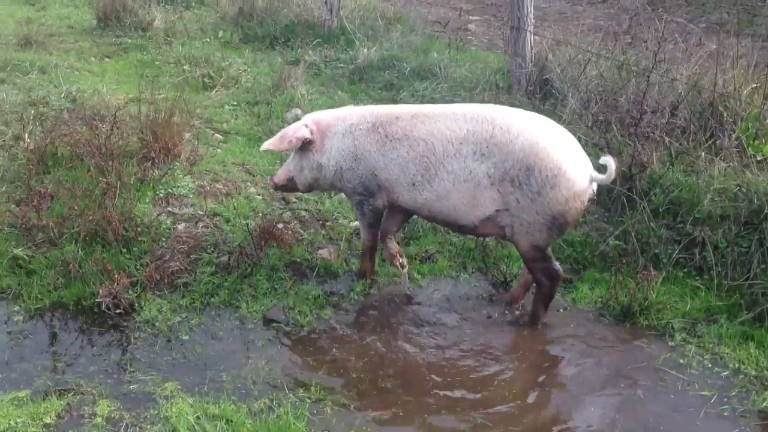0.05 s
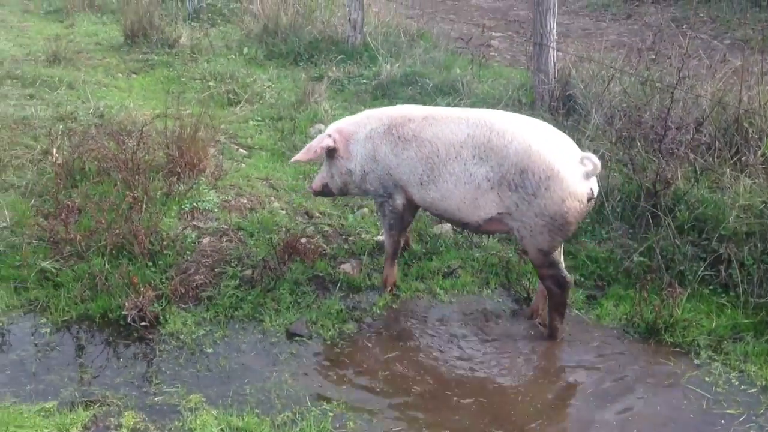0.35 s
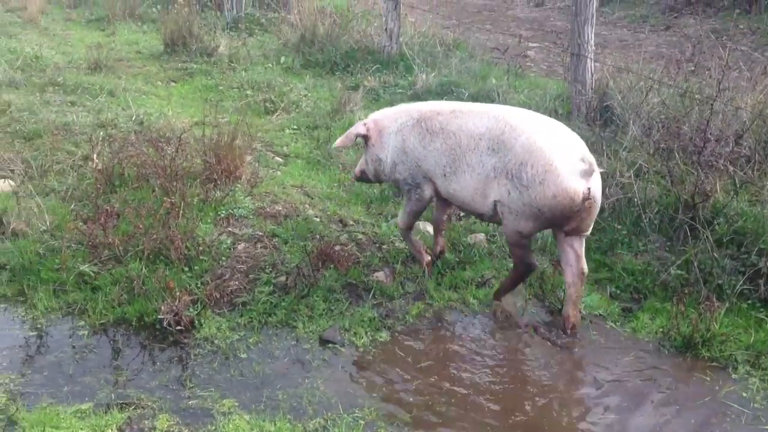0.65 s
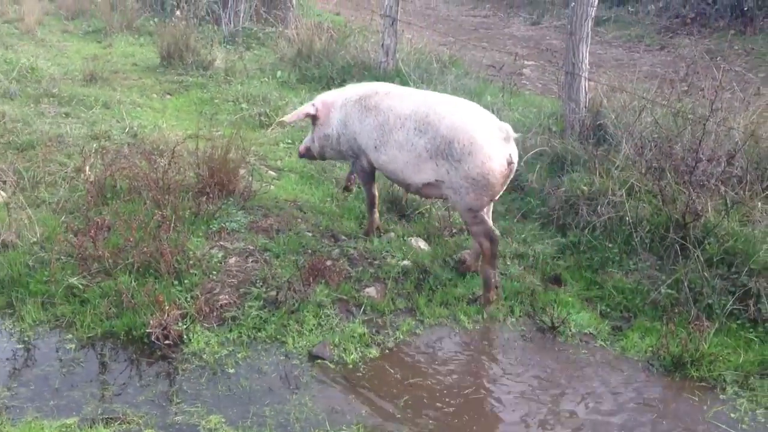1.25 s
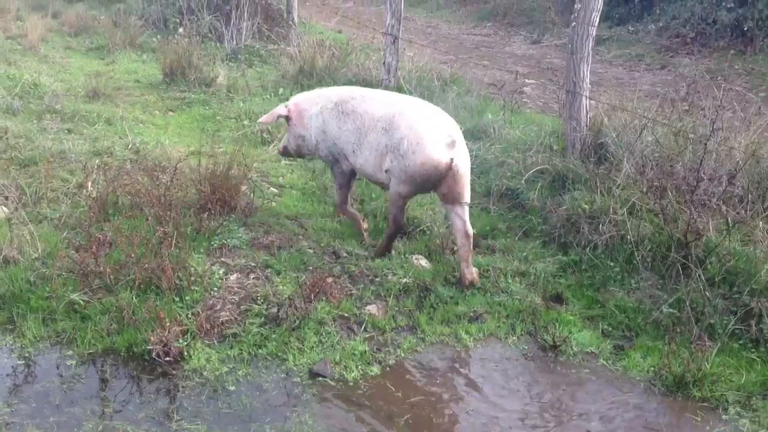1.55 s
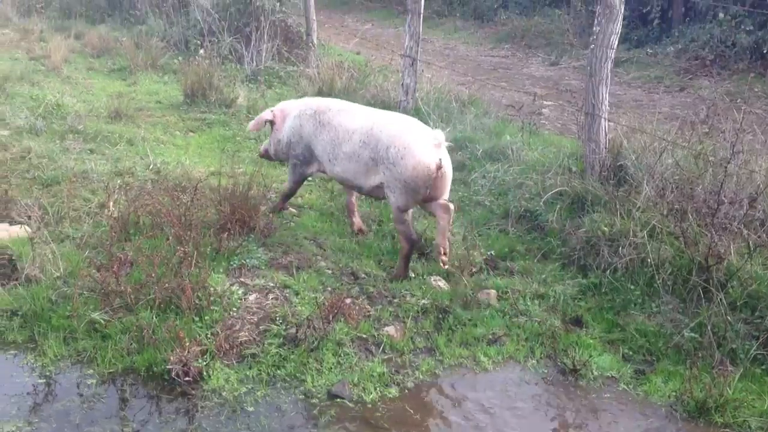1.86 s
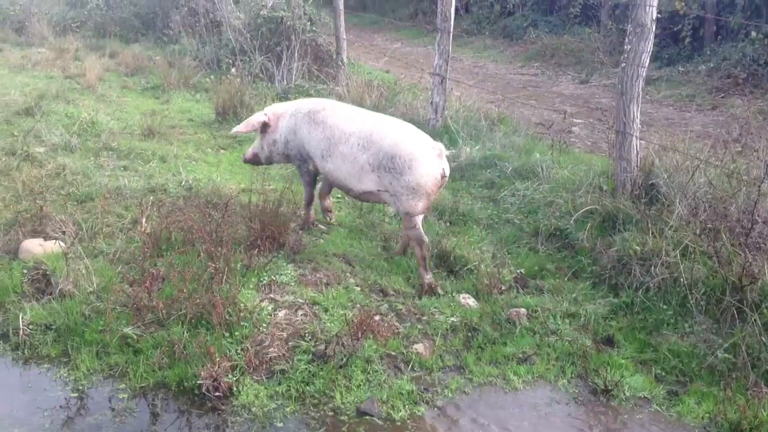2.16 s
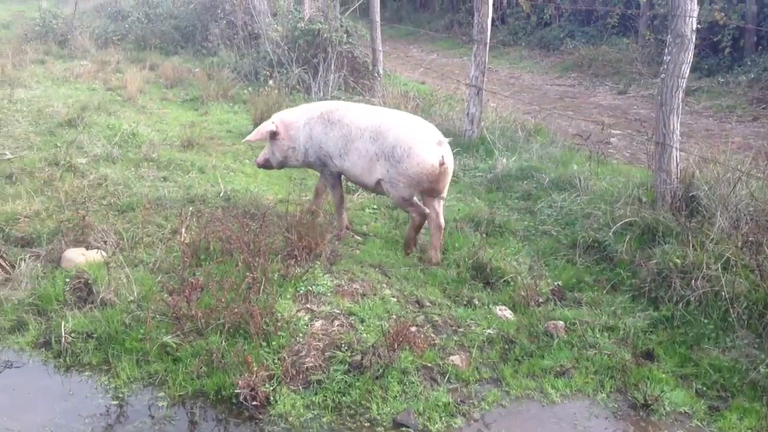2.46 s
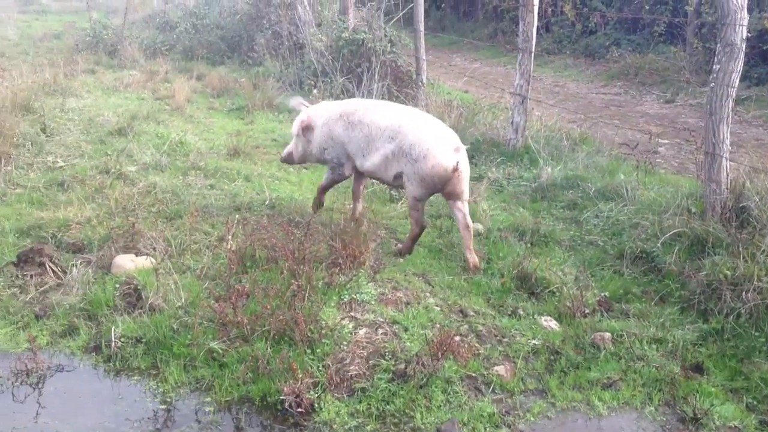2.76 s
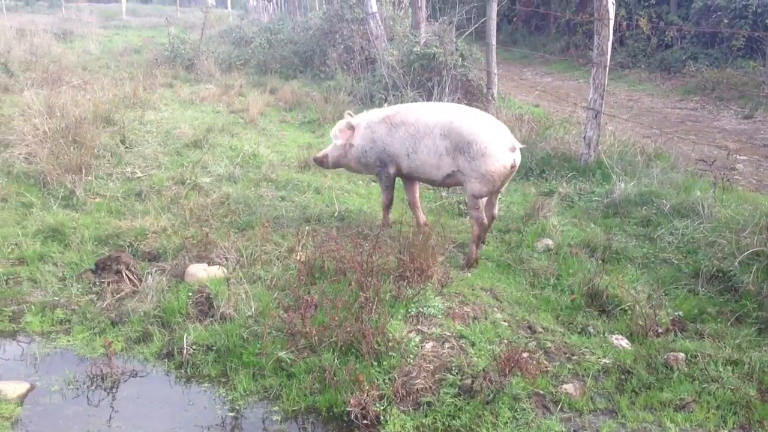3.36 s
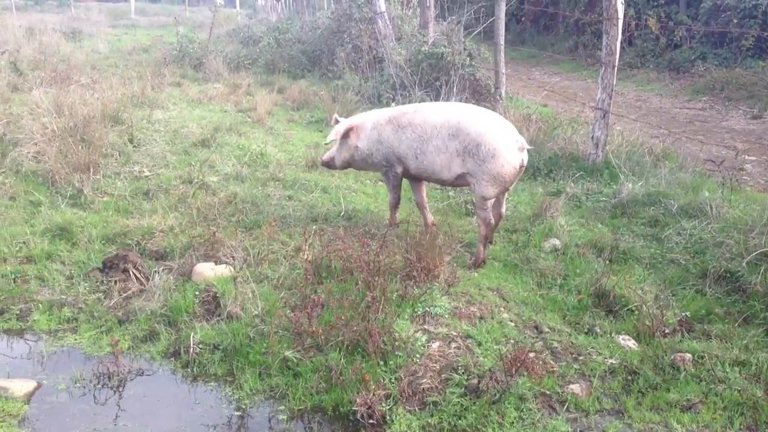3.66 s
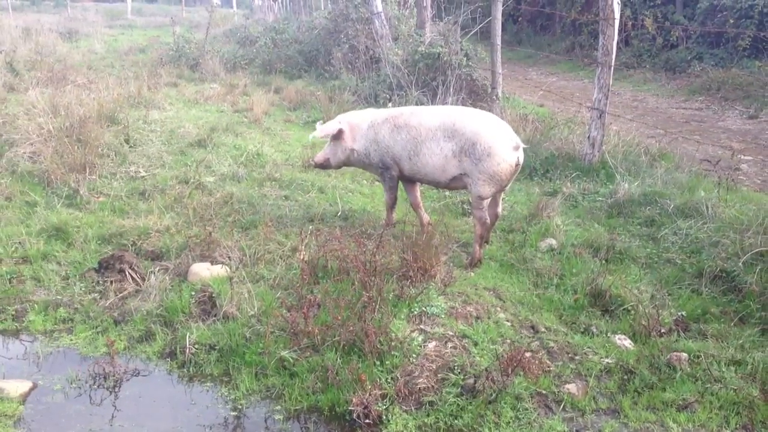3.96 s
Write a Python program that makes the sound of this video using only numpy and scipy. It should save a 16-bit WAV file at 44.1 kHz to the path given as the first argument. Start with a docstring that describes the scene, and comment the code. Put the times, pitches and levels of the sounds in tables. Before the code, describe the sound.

Wet steps of a pig through water and mud, with wind bumping the microphone.

```python
"""A pig wading out of a puddle

A few metres away, a pig leaves a muddy puddle and walks off over sodden grass.
Its legs slosh up ringing bubbles and spray, drops tick, stems swish and hooves splat.
Wet pockets of mud pop open with a hollow smack.
A light wind bumps against the microphone, and a small bird whistles far off."""
import sys
import numpy as np
from scipy import signal
from scipy.fft import rfft, irfft, next_fast_len
from scipy.io import wavfile
from scipy.ndimage import uniform_filter1d

SR = 44100
rng = np.random.default_rng(int(sys.argv[2]) if len(sys.argv) > 2 else 0)


def materialize(psi):
    """Save the field psi as 16-bit PCM at rate SR to the path in sys.argv[1].

    A 1-D psi becomes a single channel; in a 2-D psi each row is a channel.
    """
    bounded = np.clip(np.atleast_2d(psi).T, -1, 1)
    quanta = np.round(bounded * 32767).astype(np.int16)
    wavfile.write(sys.argv[1], SR, quanta)


N = 176400  # 4 seconds


def gain(db):
    """Turn decibels into a multiplier."""
    return 10 ** (np.asarray(db) / 20)


def unit_rms(x):
    """Scale to an average (rms) level of 1."""
    return x / np.sqrt(np.mean(x ** 2))


def with_peak(x, db):
    """Scale to a peak level."""
    return x * gain(db) / np.abs(x).max()


def add(out, start_s, x):
    """Mix a short sound in at a given time."""
    i = max(int(start_s * SR), 0)
    out[i:i + len(x)] += x[:max(N - i, 0)]


def shape_tone(x, tone):
    """Filter a sound to follow a curve of (frequency_hz, level_db) points."""
    hz, db = np.array(tone).T
    size = 2 * next_fast_len(len(x))
    freqs = np.maximum(np.fft.rfftfreq(size, 1 / SR), 1)
    curve_db = np.interp(np.log(freqs), np.log(hz), db)
    cepstrum = irfft(np.log(gain(curve_db)))
    # fold it so that the filter rings only after a hit, never before
    cepstrum[1:size // 2] *= 2
    cepstrum[size // 2 + 1:] = 0
    return irfft(rfft(x, size) * np.exp(rfft(cepstrum)))[:len(x)]


def wander(rate_hz):
    """A smooth random drift with a typical size of 1."""
    hold = max(int(SR / rate_hz), 2)
    stairs = np.repeat(rng.standard_normal(N // hold + 1), hold)
    return unit_rms(uniform_filter1d(stairs, hold)[:N])


def echo(x, decay_s, level_db):
    """Add the soft tail of sound scattered by ground and hedges."""
    t = np.arange(SR // 2) / SR
    tail = rng.standard_normal(len(t)) * np.exp(-t / decay_s) * (1 - np.exp(-2 * t / decay_s))
    return x + gain(level_db) * signal.fftconvolve(x, tail / np.linalg.norm(tail))[:N]


def burst(decay_s, tone):
    """A short crack of filtered noise."""
    t = np.arange(SR // 20) / SR
    return shape_tone(rng.standard_normal(len(t)) * np.exp(-t / decay_s), tone)


# Tone of the background hiss: frequency_hz, level_db
AIR_TONE = [(290, -20), (500, -4.5), (780, -2.5), (875, -1.5), (1070, -7), (1250, -2.5), (1510, -9),
            (1820, -6), (2290, -8), (2840, -8), (5030, -13.5), (14500, -16.5), (15400, -12.5)]


def air(level_db=-71.5):
    """The faint, even hiss of the open field."""
    return gain(level_db) * unit_rms(shape_tone(rng.standard_normal(N), AIR_TONE))


# The bird's notes: start_s, length_s, start_hz, end_hz, level_db
BIRD_NOTES = [(1.005, 0.06, 3340, 3200, -68), (1.039, 0.054, 3080, 2890, -63),
              (1.426, 0.059, 2870, 2750, -67), (1.65, 0.092, 3910, 3600, -67),
              (2.262, 0.037, 2807, 2884, -61.5), (2.522, 0.041, 4000, 3900, -63),
              (2.558, 0.05, 3940, 3620, -73), (2.591, 0.032, 2930, 2800, -67)]


def bird():
    """Thin, gliding whistles with a slight warble, smeared by distance."""
    out = np.zeros(N)
    warble = 1 + 0.013 * wander(rate_hz=300.6)
    for at, length, start_hz, end_hz, db in BIRD_NOTES:
        progress = np.linspace(0, 1, int(length * SR))
        glide_hz = start_hz + (end_hz - start_hz) * progress
        cycles = np.cumsum(glide_hz * warble[int(at * SR):][:len(progress)]) / SR
        add(out, at, gain(db) * np.sin(np.pi * progress) * np.sin(2 * np.pi * cycles))
    return echo(out, decay_s=0.039, level_db=-5)


# How strong the wind is over time: time_s, level_db
RUMBLE_LEVELS = [(0, -51.5), (.09, -55), (.19, -48.5), (.25, -61), (0.338, -63.5), (.41, -52.5),
                 (.5, -48.5), (.61, -47.5), (.73, -51), (.92, -44.5), (1.3, -48.5), (1.55, -51),
                 (1.76, -49), (1.83, -48), (1.98, -51.5), (2.15, -53), (2.3, -49.5), (2.68, -51),
                 (3.0, -44.5), (3.2, -48), (3.45, -51), (3.66, -54), (3.8, -48), (3.9, -45), (4.0, -77)]
# Tone of its rumble: frequency_hz, level_db
RUMBLE_TONE = [(20, -55), (32, -31.5), (50, -23), (80, -8.5), (125, 0.5), (175, 1), (250, -9.5), (350, -17),
               (520, -34.5), (900, -50), (2000, -96)]


def wind_rumble(flutter_db=7):
    """Swirling air makes a low, fluttering rumble."""
    level_db = np.interp(np.arange(N) / SR, *np.array(RUMBLE_LEVELS).T)
    level_db += flutter_db * np.tanh(wander(rate_hz=47.96))
    return unit_rms(shape_tone(rng.standard_normal(N), RUMBLE_TONE)) * gain(level_db)


# Soft thumps of wind: peak_time_s, level_db, pitch_hz
WIND_THUMPS = [(0.082, -30.5, 148), (0.168, -35, 160), (0.415, -32, 149), (0.652, -32, 200),
               (1.034, -36, 230), (1.61, -31, 176), (1.83, -27.5, 172), (2.488, -31.5, 160),
               (3.24, -29.5, 185), (3.37, -30, 160), (3.609, -31.5, 191), (3.951, -33, 175),
               (0.479, -30, 153), (0.511, -27, 215), (0.552, -32, 176), (0.592, -25.5, 190),
               (0.826, -44, 152), (0.841, -26, 162), (0.889, -29.5, 175), (0.923, -28, 191),
               (0.951, -22, 190), (0.992, -33, 168), (1.094, -27.5, 235), (1.121, -25.5, 198),
               (1.178, -25, 167), (1.293, -30.5, 191), (1.316, -26, 194), (1.676, -31.5, 163),
               (1.911, -26.5, 158), (2.153, -26, 193), (2.208, -29.5, 143), (2.283, -23.5, 152),
               (2.302, -29, 177), (2.335, -23.5, 180), (2.434, -24.5, 166), (2.534, -29, 164),
               (2.559, -25, 195), (2.752, -24.5, 202), (2.824, -18, 175.5), (2.915, -26.5, 184),
               (2.943, -23, 220), (2.977, -27, 215), (3.003, -31.5, 172), (3.079, -32, 275),
               (3.098, -28.5, 191), (3.126, -29, 174), (3.157, -22, 179), (3.203, -26, 212),
               (3.249, -22, 173), (3.279, -32.5, 166), (3.407, -26.5, 203), (3.455, -30, 168),
               (3.551, -26.5, 164), (3.745, -20.5, 187), (3.776, -22, 180), (3.837, -27.5, 164),
               (3.86, -24.5, 151)]
# Hard, dull knocks among them: start_s, level_db
WIND_KNOCKS = [(.509, -43), (0.534, -39), (.605, -37.5), (0.827, -38), (1.035, -44), (1.309, -44.5),
               (1.824, -42.5), (2.05, -40.5), (2.113, -41), (2.275, -37.5), (2.973, -31), (3.074, -25.5),
               (3.098, -26), (3.11, -36.5), (3.742, -39), (3.779, -41), (3.823, -53), (3.953, -40.5)]
# Tone of a knock: frequency_hz, level_db
KNOCK_TONE = [(60, -30.5), (150, 11.5), (260, 7), (400, 0.5), (520, -14), (900, -39.5), (2000, -51)]


def wind_bumps(rise_cycles=0.4, thump_trim_db=-5, knock_s=0.0023, low_cut_hz=90.5):
    """Single swirls of air thump the microphone for a cycle or two."""
    out, t = np.zeros(N), np.arange(-SR // 20, SR // 20) / SR
    for at, db, hz in WIND_THUMPS:
        width_s = rise_cycles / hz * np.where(t > 0, 0.98, 1)  # falls a touch faster than it rises
        swell = gain(db + thump_trim_db) / np.cosh(t / width_s)
        add(out, at + t[0], swell * np.cos(2 * np.pi * (hz * t + rng.random())))
    for at, db in WIND_KNOCKS:
        add(out, at, with_peak(burst(knock_s, KNOCK_TONE), db))
    return signal.sosfilt(signal.butter(3, low_cut_hz, "high", fs=SR, output="sos"), out)


def fizz(tone, hits_per_s, spread_db=3.5, ring_cycles=2):
    """Tiny impacts of very uneven size, each ringing briefly at its own pitch."""
    out, pitches = 0, np.geomspace(600, 15000, 24)
    for hz in pitches:
        size = gain(spread_db * np.minimum(rng.exponential(size=N), 5)) * rng.choice([-1, 1], N)
        hits = size * (rng.random(N) < hits_per_s * hz / pitches.sum() / SR)
        pole = np.exp((2j * np.pi - 1 / ring_cycles) * hz / SR)
        ringing = signal.lfilter([1], [1, -pole], hits).imag  # each hit becomes a fading sine wave
        out = out + np.sqrt(hz) * unit_rms(ringing)
    return unit_rms(shape_tone(out, tone))


# Legs swinging through water and grass: peak_time_s, rise_s, fall_s, slosh_db, spray_db
LEG_SWINGS = [(.09, 0.1, 0.086, -72, -71), (0.316, 0.077, 0.03, -66.5, -67.5), (.47, 0.095, 0.13, -73, -72),
              (0.616, 0.029, 0.12, -64.5, -71.5), (.705, 0.021, 0.06, -64.5, -71),
              (0.781, 0.012, 0.067, -64, -61), (0.816, 0.017, 0.017, -66, -83),
              (.98, 0.067, 0.3, -70.5, -70.5), (1.142, 0.04, 0.032, -80, -62),
              (1.186, 0.0086, 0.0087, -67, -66), (1.355, 0.0075, 0.029, -70, -67.5),
              (1.42, 0.023, 0.04, -63.5, -68.5), (1.69, 0.095, 0.059, -67.5, -74.5),
              (1.805, 0.035, 0.035, -78, -71.5), (1.92, 0.055, 0.13, -81, -74),
              (2.16, 0.074, 0.28, -77.5, -78), (2.41, 0.011, 0.0084, -87, -72.5),
              (2.51, 0.028, 0.11, -72.5, -78), (2.69, 0.032, 0.033, -85, -77),
              (2.85, 0.079, 0.029, -72, -75.5), (2.933, 0.048, 0.15, -65, -68.5),
              (3.18, 0.017, 0.089, -79, -81.5), (3.335, 0.034, 0.076, -85, -79),
              (3.49, 0.054, 0.1, -71, -73)]
# Tone of sloshing water, also used for a bubble's plip: frequency_hz, level_db
SLOSH_TONE = [(300, -30), (700, -12), (1200, -1.5), (2000, 6.5), (2900, 5), (4000, -4.5), (5200, -8.5),
              (8000, -15)]
# Tone of the spray: frequency_hz, level_db
SPRAY_TONE = [(1500, -49), (3600, -14), (5200, -20), (7000, -9.5), (10500, -8), (13000, -9.5),
              (16000, -14.5)]


def leg_swishes():
    """Each swing of a leg brings a swell of sloshing, fine mist and crackling droplets."""
    t, slosh_level, spray_level = np.arange(N) / SR, 0, 0
    for at, rise, fall, slosh_db, spray_db in LEG_SWINGS:
        swell = np.exp(-np.where(t < at, ((t - at) / rise) ** 2, (t - at) / fall))
        slosh_level += swell * gain(slosh_db)
        spray_level += swell * gain(spray_db)
    mist = gain(1.5) * fizz(SPRAY_TONE, hits_per_s=7000)
    droplets = gain(-4.5) * fizz(SPRAY_TONE, hits_per_s=420)
    slosh = fizz(SLOSH_TONE, hits_per_s=3600)
    return slosh_level * slosh + spray_level * (mist + droplets)


# Ticks of drops and grass: time_s, level_db, pitch_hz
DROP_TICKS = [(0.0103, -44, 8350), (0.0642, -39.5, 6160), (0.0728, -42, 5760), (0.0383, -65, 9000),
              (0.096, -45, 9890), (0.119, -54, 8300), (0.1432, -40.5, 10050), (0.162, -45, 8590),
              (0.2543, -49, 9400), (0.2787, -37.5, 7800), (0.313, -37, 6570), (0.3463, -46, 9100),
              (0.406, -51, 11500), (0.4166, -47, 7200), (0.4393, -37, 8740), (0.48, -43, 10100),
              (0.5118, -45, 6760), (0.5901, -51, 8950), (0.6123, -40.5, 6030), (0.681, -37, 10460),
              (0.74, -51, 8400), (0.767, -42, 5900), (0.7772, -35, 6600), (0.793, -39, 6060),
              (0.82, -51, 8400), (0.8454, -39.5, 11000), (1.0146, -48, 6560), (1.03, -44, 9100),
              (1.0675, -48, 9500), (1.0864, -51, 10500), (1.1757, -45, 9340), (1.3918, -44, 11180),
              (1.4249, -36, 10550), (1.47, -46.5, 13000), (1.7875, -49, 6800), (1.8076, -47, 11800),
              (1.8918, -52, 10000), (1.9967, -49, 9050), (2.03, -51, 9900), (2.1044, -41, 10600),
              (2.155, -52, 6400), (2.46, -52, 12400), (2.51, -50, 10400), (2.84, -43.5, 12600),
              (2.9366, -43, 8700), (3.0386, -43, 11200), (3.1757, -48, 11300), (3.6134, -52.5, 11300),
              (3.754, -56, 5900), (3.8467, -54, 9750)]
# Tone of a tick, also used for the crack of mud: frequency_hz, level_db
TICK_TONE = [(1000, -26), (3500, 1), (5200, -10), (7000, 1), (10500, 1), (13000, -4.5), (16000, -2)]


def drop_ticks(delay_s=0.0021, crack_s=0.0029, crack_db=-6.5, ring_s=0.0014, ring_db=-9):
    """Drops and blades of grass tick with a tiny crack and a brief, high ring."""
    out, t = np.zeros(N), np.arange(SR // 50) / SR
    for at, db, hz in DROP_TICKS:
        around_pitch = [(hz / 2, -8), (hz, 0), (2 * hz, -8)]
        crack = shape_tone(burst(crack_s, TICK_TONE), around_pitch)
        ring = np.sin(2 * np.pi * hz * t) * np.exp(-t / ring_s)
        add(out, at + delay_s, with_peak(crack, db + crack_db))
        add(out, at + delay_s, gain(db + ring_db) * ring)
    return out


# Splats of hooves and stems: start_s, peak_db
HOOF_SPLATS = [(.304, -42), (.778, -37), (0.802, -45), (.811, -47), (0.823, -40.5), (1.121, -31),
               (1.425, -45), (1.433, -49), (1.52, -51), (1.626, -53), (1.929, -46)]
# Tone of a splat: frequency_hz, level_db
SPLAT_TONE = [(200, -8), (700, 0), (1100, -5.5), (1800, 4.5), (2800, -2), (3700, -1.5), (5200, -21),
              (8000, -6.5), (15000, -17)]


def hoof_splats(decay_s=0.0023):
    """Landing hooves and snapping stems make sharp bursts of noise."""
    out = np.zeros(N)
    for at, db in HOOF_SPLATS:
        add(out, at, with_peak(burst(decay_s, SPLAT_TONE), db))
    return out


def bubble(hz, decay_s, rise_per_s, wobble_hz=70, attack_s=0.00042, life_s=0.035):
    """A bubble rings, its pitch wobbling and gliding as it nears the surface, until it bursts."""
    t = np.arange(SR // 10) / SR
    wobble = 0.022 * np.sin(2 * np.pi * (wobble_hz * t + rng.random()))
    cycles = np.cumsum(hz * (1 + rise_per_s * t + wobble)) / SR
    loudness = (1 - np.exp(-t / attack_s)) * np.exp(-t / decay_s)
    cutoff = np.exp(-(t / life_s) ** 4)
    return np.sin(2 * np.pi * cycles) * loudness * cutoff


# Swarms of small bubbles: start_s, length_s, level_db
BUBBLE_SWARMS = [(0, 0.12, -62), (0.28, 0.13, -72), (0.585, 0.13, -61.5), (0.788, 0.071, -73)]


def gurgles(bubbles_per_s=520, middle_hz=1966, spread_octaves=1.08, spread_db=5, ring_cycles=2.3):
    """A leg churns up many small bubbles, each with its own pitch and loudness."""
    out = np.zeros(N)
    for start, length, db in BUBBLE_SWARMS:
        for k, (jitter, pitch, strength, glide) in enumerate(rng.uniform(-0.91, 1, (120, 4))):
            delay = (k + (jitter + 1) / 2) / bubbles_per_s
            if delay < length:
                hz = middle_hz * 2 ** (spread_octaves * pitch)
                ring = bubble(hz, ring_cycles / hz, rise_per_s=5.4 * (1 + glide))
                add(out, start + delay, with_peak(ring, db + spread_db * (strength - 0.5)))
    return out


# Single bubbles: start_s, pitch_hz, level_db, decay_s, rise_per_s (share of the pitch; minus falls)
PUDDLE_BUBBLES = [(0.011, 1816, -43.5, 0.0039, -1), (0.068, 4600, -51, 0.0036, -4),
                  (.075, 818, -52, 0.02, 9), (0.102, 1540, -46.5, 0.0081, -3.5),
                  (0.121, 2050, -47.5, 0.0053, 9), (.162, 1860, -59.5, 0.0067, 9),
                  (.208, 1210, -48.5, 0.0041, 3), (.245, 847, -46.5, 0.0067, 16),
                  (.261, 638, -52, 0.034, 8), (.281, 740, -51, .016, 19), (.304, 1235, -46, 0.0032, 18),
                  (0.303, 2100, -43, 0.0013, 0), (.314, 2070, -40.5, 0.0011, 6),
                  (.337, 793, -55.5, 0.0091, -2), (.348, 4030, -45.5, 0.0018, 12),
                  (.407, 1890, -53, .007, -4), (0.477, 4400, -52.5, 0.0032, 1),
                  (0.517, 1900, -58, 0.0078, 3.5), (.585, 907, -53.5, 0.024, 3.5),
                  (.594, 2040, -50, 0.0049, 11), (0.612, 1155, -49, 0.015, 1),
                  (0.616, 1975, -40.5, 0.0036, -5), (.604, 2150, -49, 0.0035, 2),
                  (.638, 2250, -50, 0.005, 16), (.647, 2780, -51, .004, 16), (.679, 3150, -57, .003, -2),
                  (.667, 782, -52.5, 0.0099, 5), (0.662, 1130, -57, .01, 0), (.686, 1260, -50.5, 0.006, 8),
                  (.701, 1480, -49, 0.006, 2), (0.706, 2390, -46.5, 0.0066, 21),
                  (0.721, 1470, -58, .005, 12), (.790, 3500, -46.5, 0.0026, 0), (.794, 1320, -62, .004, 11),
                  (.802, 4100, -47.5, 0.0023, 4), (.810, 3000, -43, .002, 2), (0.82, 2500, -43, 0.0017, 18),
                  (.849, 2130, -46.5, 0.0057, 21), (.962, 2180, -48, 0.0041, -15),
                  (.969, 1157, -52.5, .010, 14.5)]


def puddle_bubbles(ring_db=-3, plip_db=-5, plip_s=0.004):
    """Large bubbles in the stirred puddle pinch off with a plip and ring."""
    out = np.zeros(N)
    for at, hz, db, decay, rise in PUDDLE_BUBBLES:
        add(out, at, with_peak(bubble(hz, decay, rise), db + ring_db))
        add(out, at, with_peak(burst(plip_s, SLOSH_TONE), db + plip_db))
    return out


# Mud pockets popping: start_s, level_db, main_pitch_hz, upper_notes_offset_db, crack_offset_db
MUD_POPS = [(2.780, -50, 740, 12, -12), (2.795, -51, 760, 11, -10), (2.808, -44, 895, -4, -20),
            (2.814, -44, 850, 4.5, -13), (2.832, -41.5, 670, 6, -23), (2.841, -50, 805, 15, 0),
            (2.846, -44, 870, -15, -21), (2.854, -44, 870, -22, -25), (2.86, -44, 870, -22, -25),
            (2.87, -35.5, 840, -8.5, -7), (2.88, -43.5, 830, -21, -6), (2.915, -47, 830, 19, -17),
            (2.923, -24.5, 776, 2.5, -17.5), (2.929, -34, 890, 8, -22), (2.937, -44, 860, 14, -4),
            (2.942, -53, 850, 8, -12), (2.949, -54, 850, 6, -9), (2.955, -52, 800, 13, -16),
            (2.966, -48, 810, 13, -19), (2.980, -52, 820, 10, -14), (2.99, -33, 850, -3.5, -24),
            (3.062, -43, 815, 8, -7), (3.069, -43, 750, 6, -9), (3.099, -45, 730, -1, -22),
            (3.177, -55, 800, -3, -16), (3.184, -50.5, 850, 3, -2), (3.199, -59, 850, 10, 4),
            (3.248, -43.5, 834, -15, -17), (3.314, -42, 970, 8, -14), (3.324, -46.5, 930, 4, -23),
            (3.347, -51, 860, 3, -15), (3.379, -57, 840, -10, -9), (3.384, -35.5, 870, -11, -28),
            (3.41, -27.5, 800, 3, -10), (3.428, -44, 870, -10, -15), (3.479, -54, 810, 7, -10),
            (3.488, -46, 790, 10, -25), (3.501, -43.5, 910, 9.5, -21), (3.509, -45.5, 865, 2, -16),
            (3.526, -45, 820, 3, -18), (3.5758, -29.5, 901, -1, -4), (3.602, -65, 815, 7, 0),
            (3.683, -53.5, 820, -14, -20)]
# The notes a pocket rings with, main one first: pitch_hz, level_db, decay_s
POCKET_NOTES = [(834, 11.5, 0.0029), (1410, -6, 0.00072), (1827, -2.5, 0.002), (2120, -5.5, 0.0021),
                (2720, -7.5, 0.0035), (3630, -15, 0.0018)]
# Tone of the snap: frequency_hz, level_db
SNAP_TONE = [(300, -13), (550, -18), (740, 8), (1050, -9.5), (1350, -3.5), (2000, 1.5), (2900, -10.5),
             (4000, -21), (5200, -21), (9000, -25)]


def mud_smacks(open_s=0.00072, ring_db=-3, snap_s=0.0053, snap_db=-15, crack_s=0.0028):
    """A wet film tears with a dry snap and a bright crack, and the hollow behind it rings."""
    out, t = np.zeros(N), np.arange(SR // 20) / SR
    opening = 1 - np.exp(-t / open_s)
    for at, db, main_hz, upper_db, crack_db in MUD_POPS:
        ring = 0
        for k, (hz, note_db, decay) in enumerate(POCKET_NOTES):
            if k == 0:
                hz = main_hz
            else:  # the upper notes vary from pop to pop
                hz *= 1 + 0.084 * rng.uniform(-0.83, 1)
                note_db += upper_db
            note = np.sin(2 * np.pi * (hz * t + rng.random()))
            ring += gain(note_db) * note * np.exp(-t / decay)
        add(out, at, with_peak(ring * opening, db + ring_db))
        add(out, at, with_peak(burst(snap_s, SNAP_TONE), db + upper_db + snap_db))
        add(out, at, with_peak(burst(crack_s, TICK_TONE), db + crack_db))
    return out


def scene():
    """The pig's wet steps with a slight echo, plus wind, bird and hiss, in one channel."""
    steps = puddle_bubbles() + gurgles() + mud_smacks() + hoof_splats() + drop_ticks() + leg_swishes()
    steps = echo(steps, decay_s=0.018, level_db=-15.5)
    return (steps + wind_rumble() + wind_bumps() + bird() + air())[None]


def record(dry, top_hz=15550):
    """Cut off the very highest treble."""
    return signal.sosfilt(signal.ellip(10, 0.2, 70, top_hz, fs=SR, output="sos"), dry)


dry = scene()
out = record(dry)
materialize(out)
```